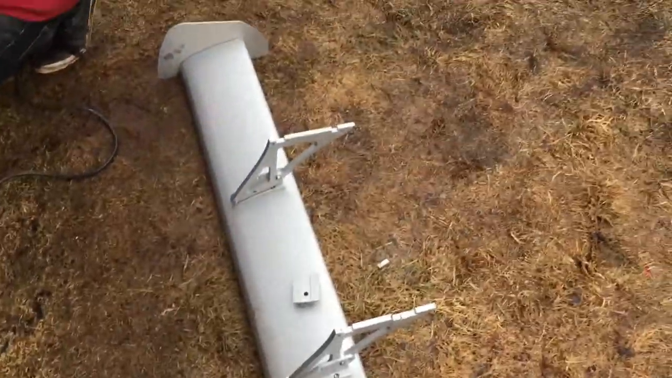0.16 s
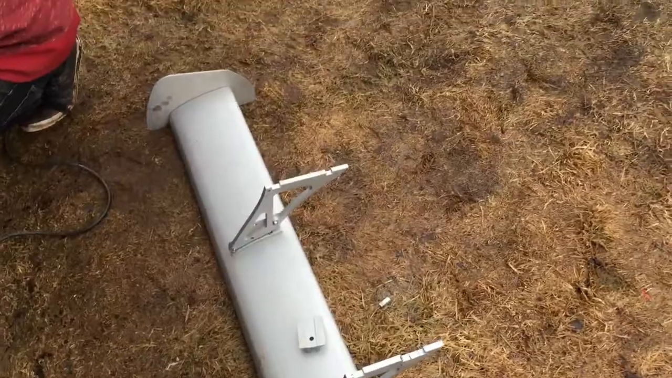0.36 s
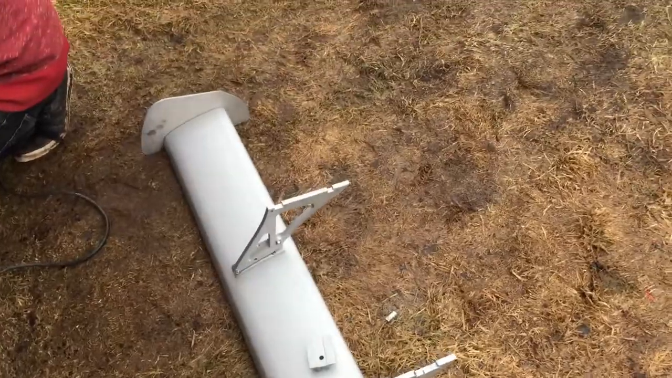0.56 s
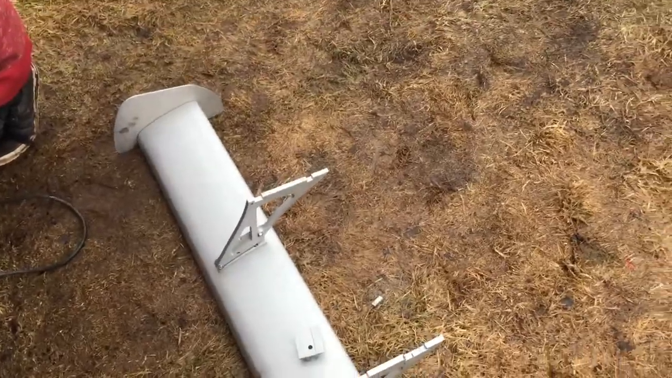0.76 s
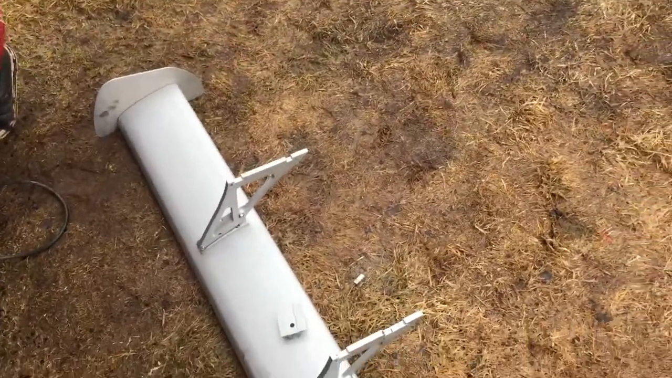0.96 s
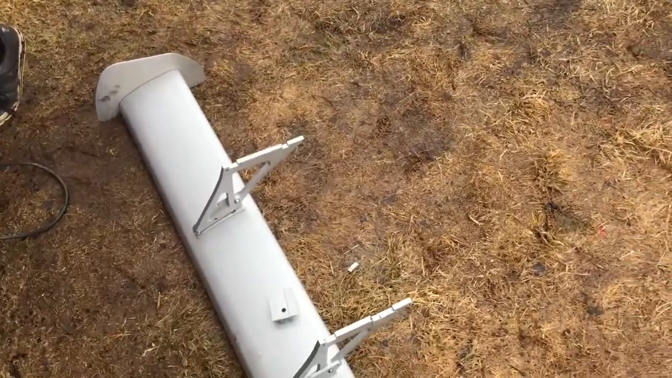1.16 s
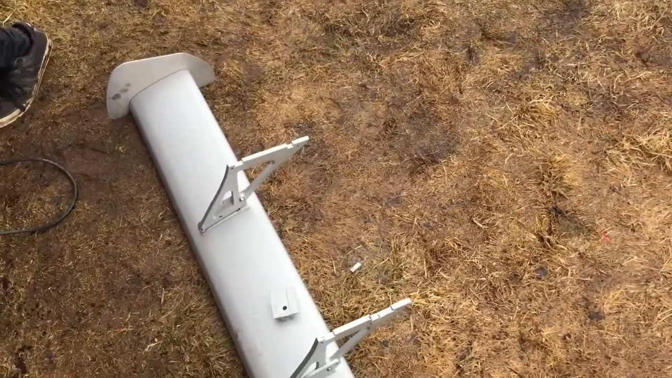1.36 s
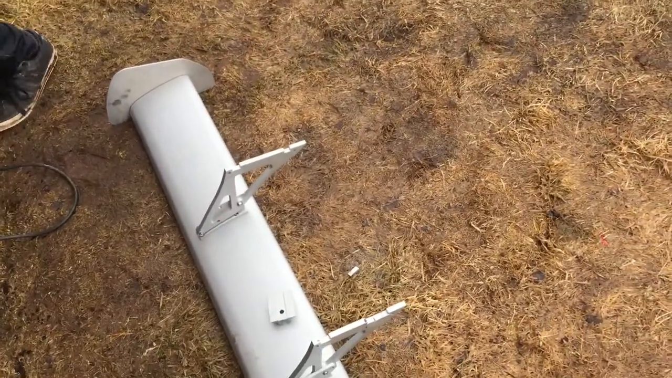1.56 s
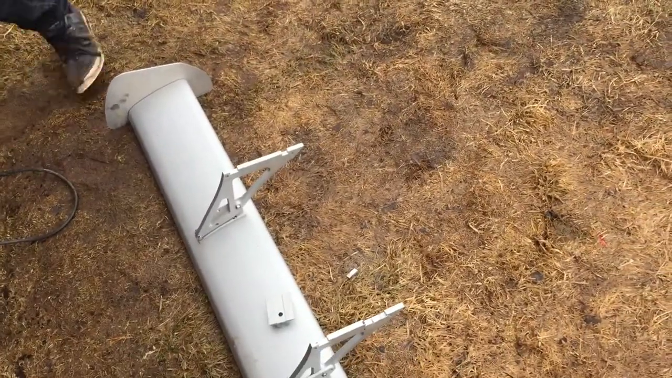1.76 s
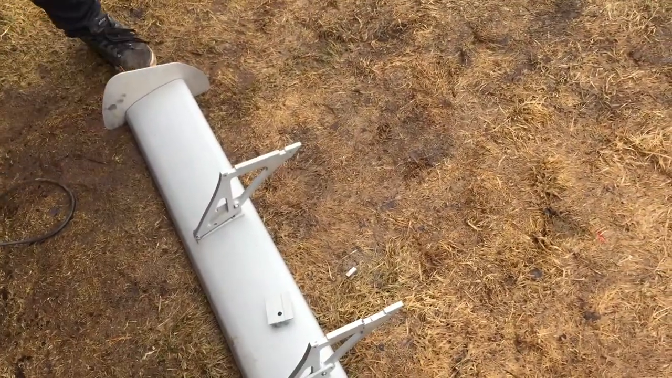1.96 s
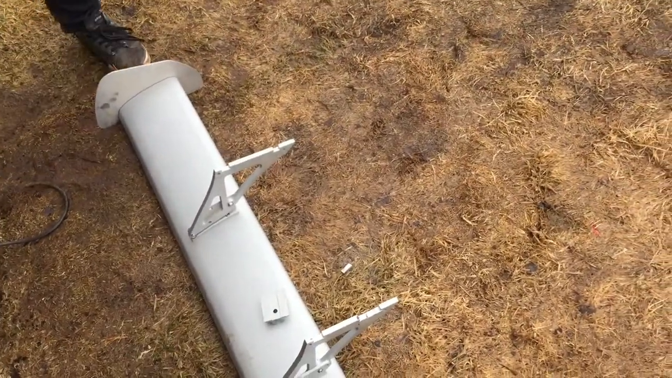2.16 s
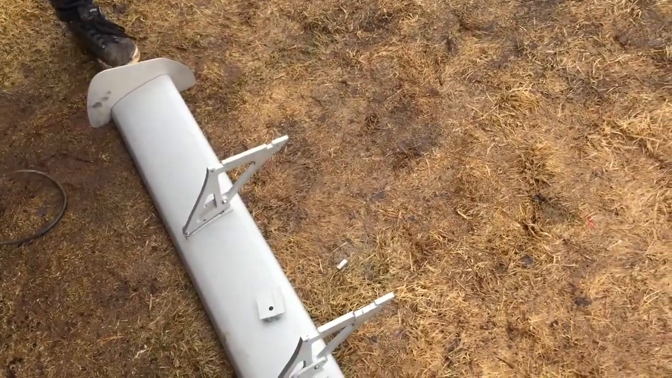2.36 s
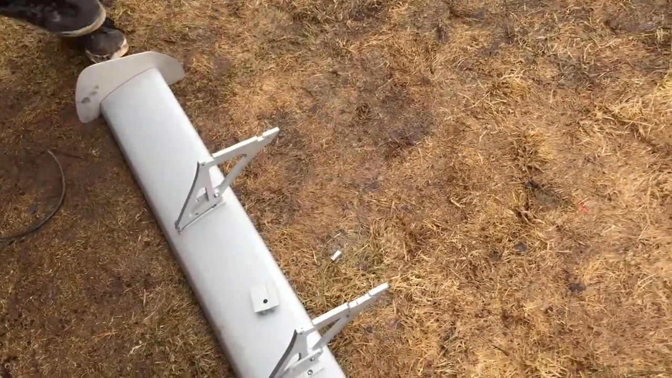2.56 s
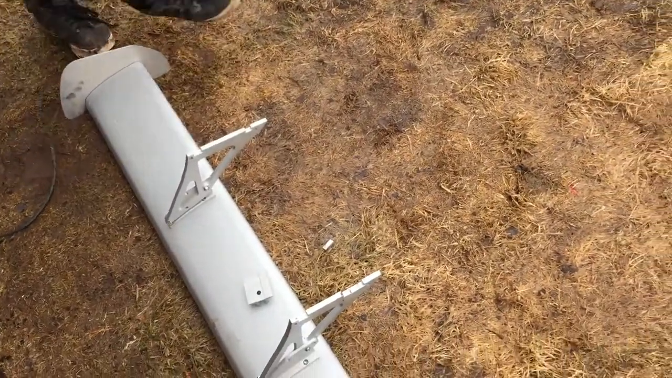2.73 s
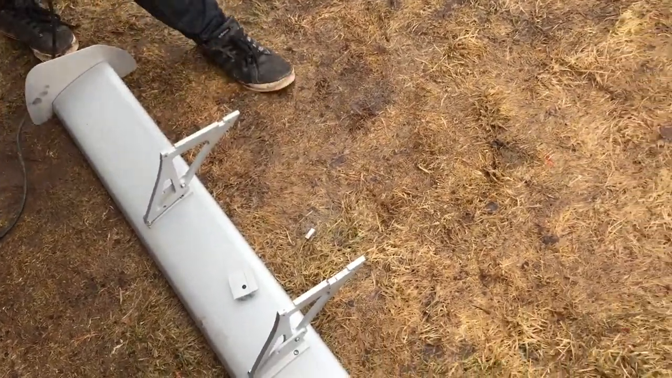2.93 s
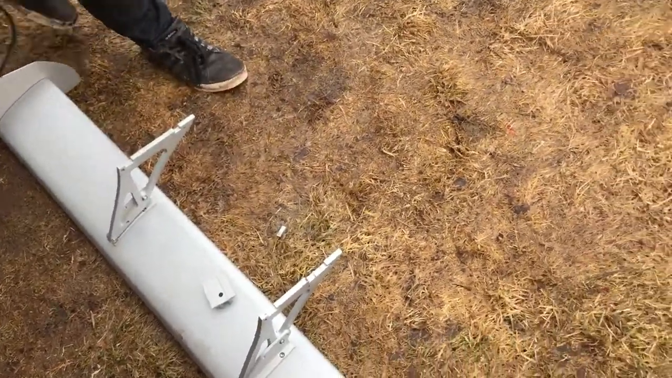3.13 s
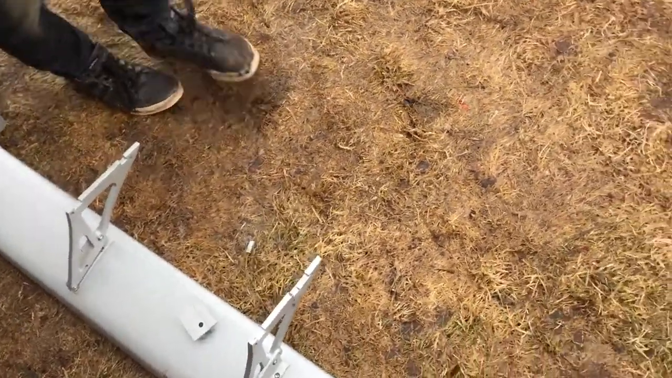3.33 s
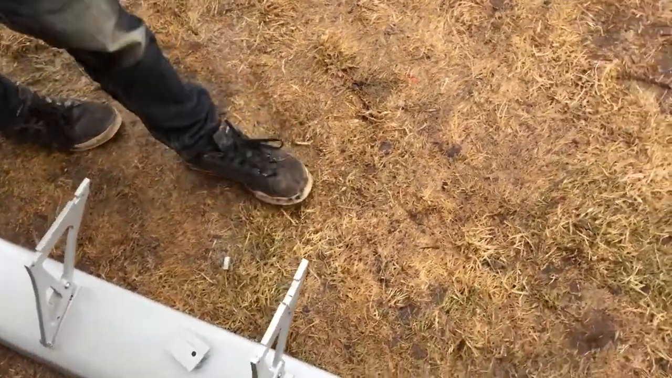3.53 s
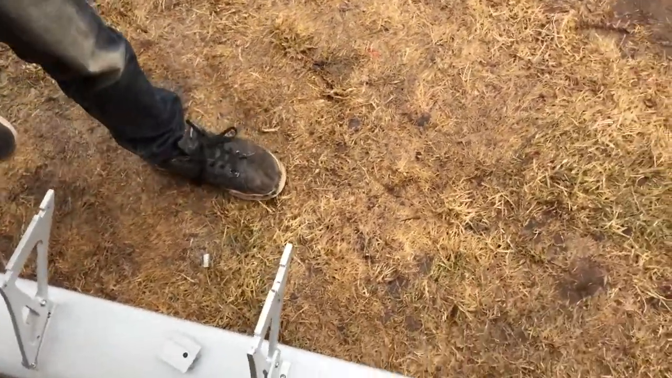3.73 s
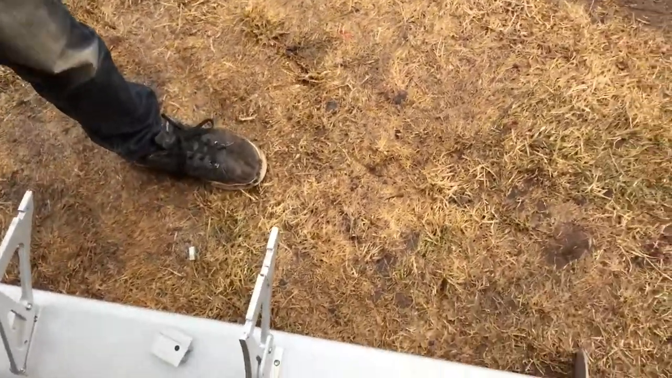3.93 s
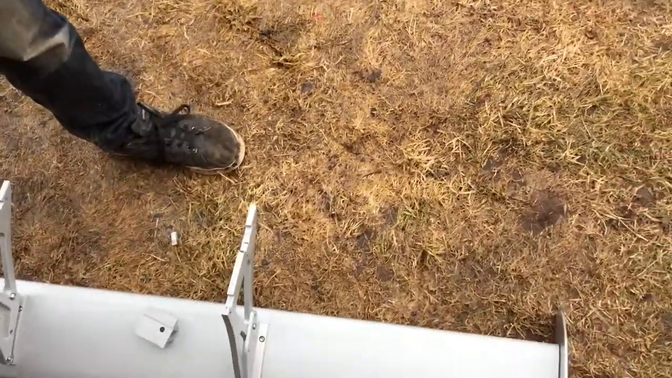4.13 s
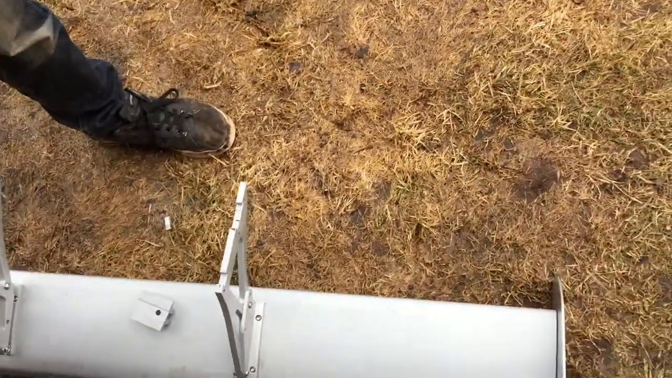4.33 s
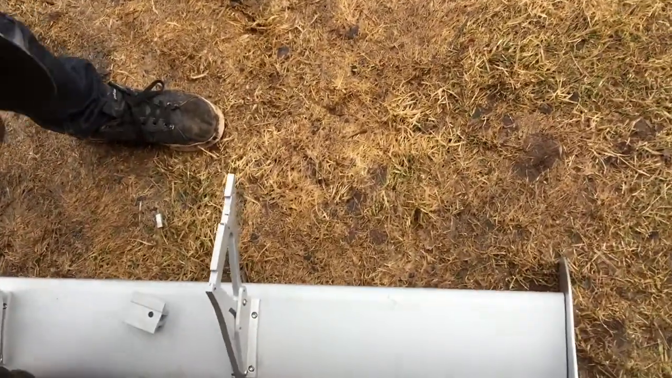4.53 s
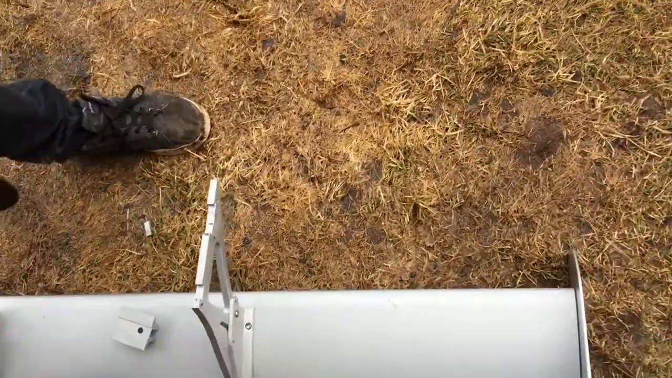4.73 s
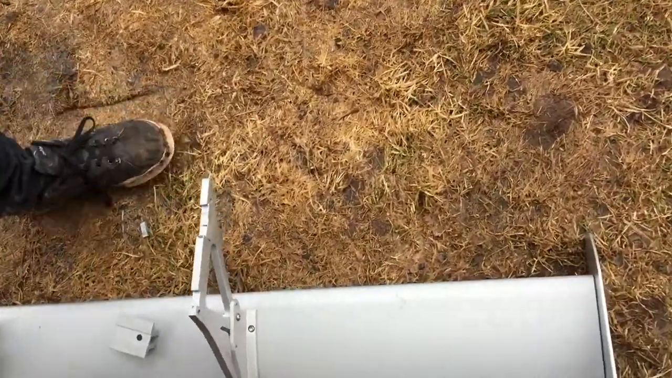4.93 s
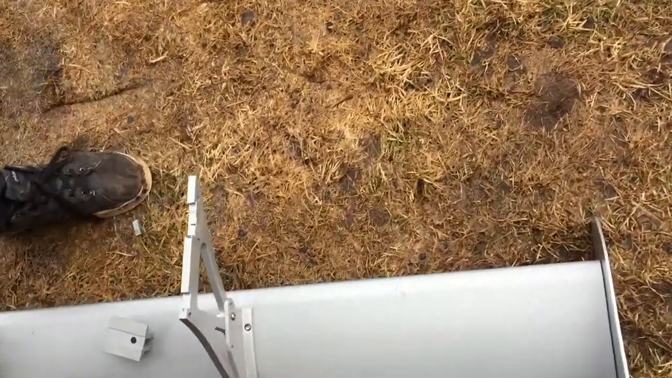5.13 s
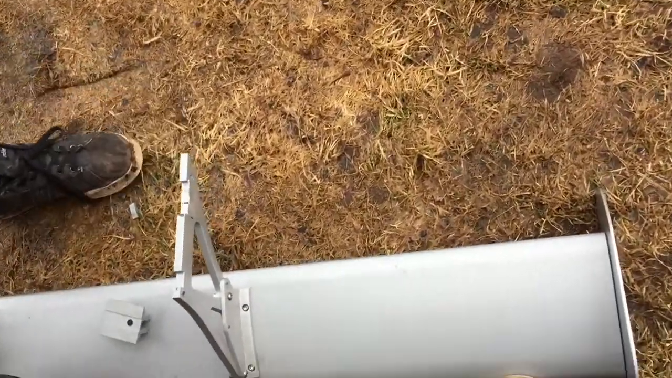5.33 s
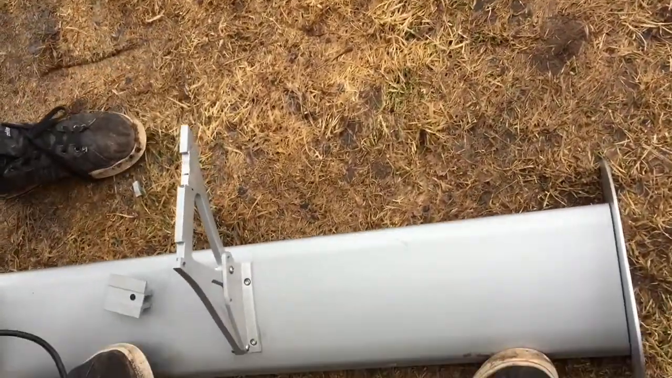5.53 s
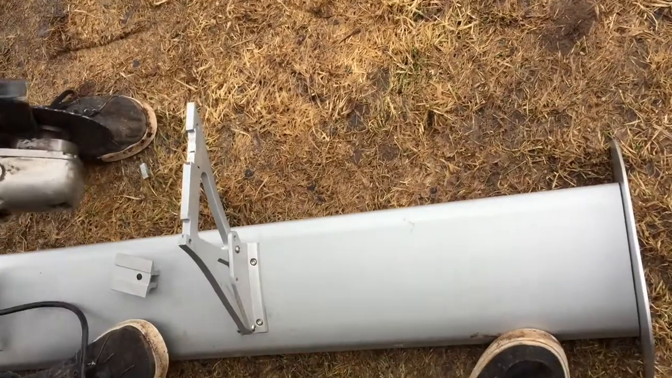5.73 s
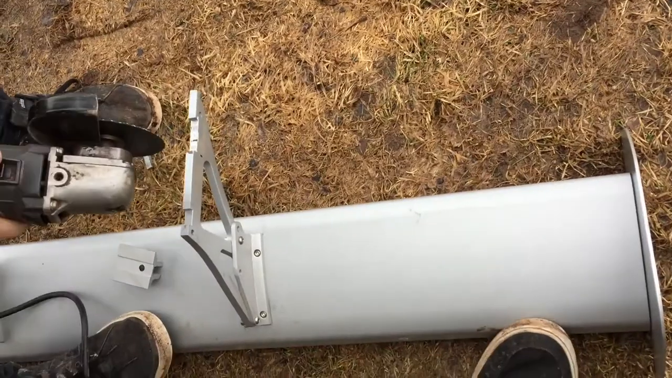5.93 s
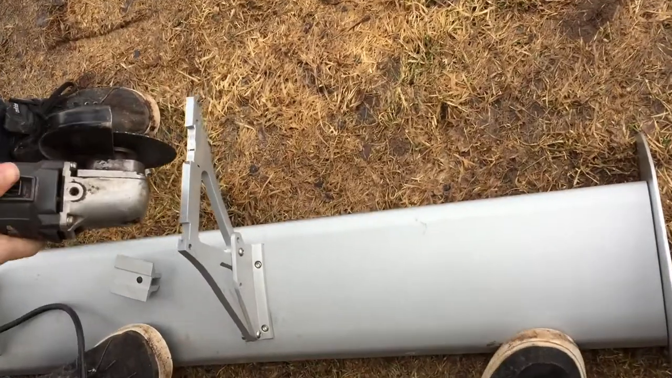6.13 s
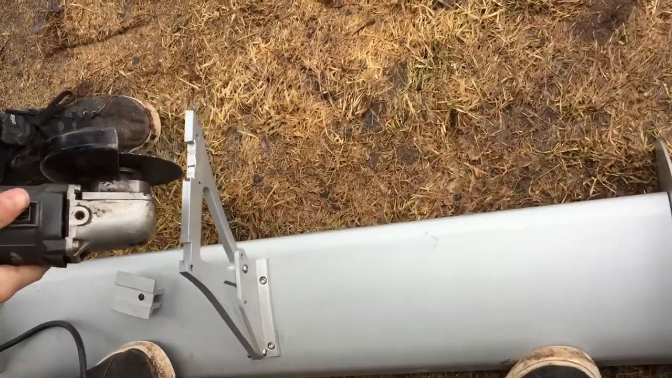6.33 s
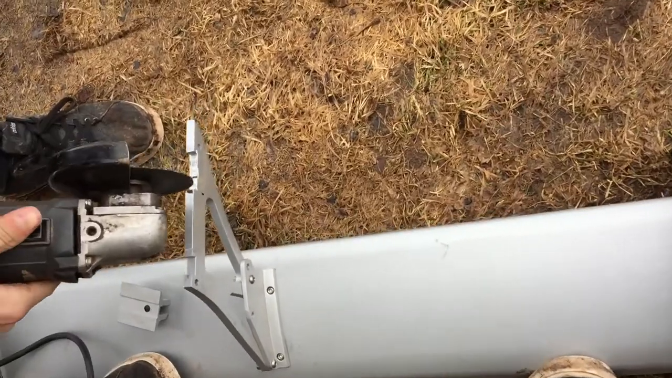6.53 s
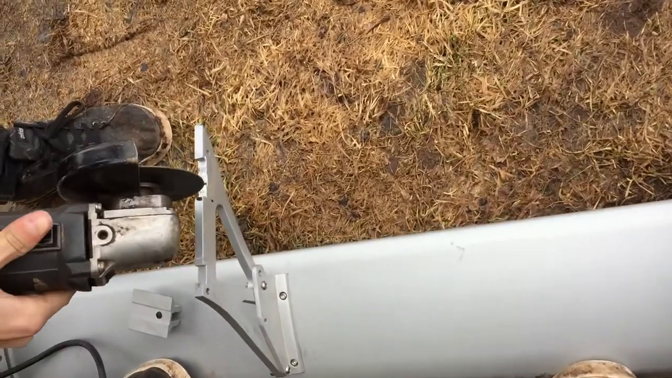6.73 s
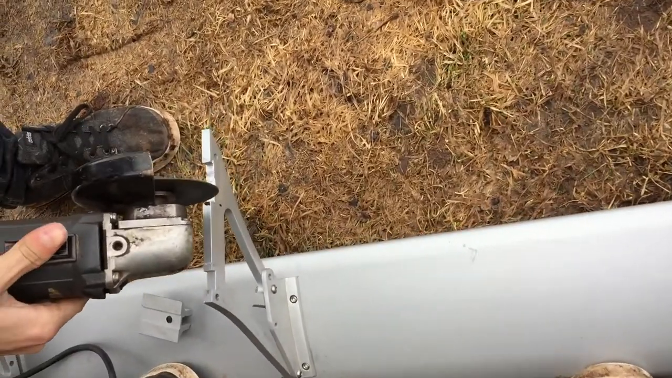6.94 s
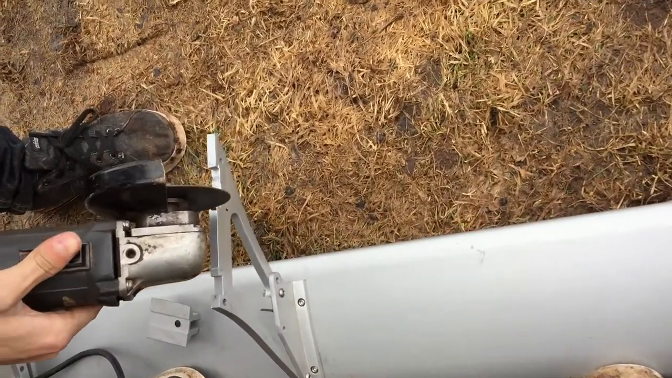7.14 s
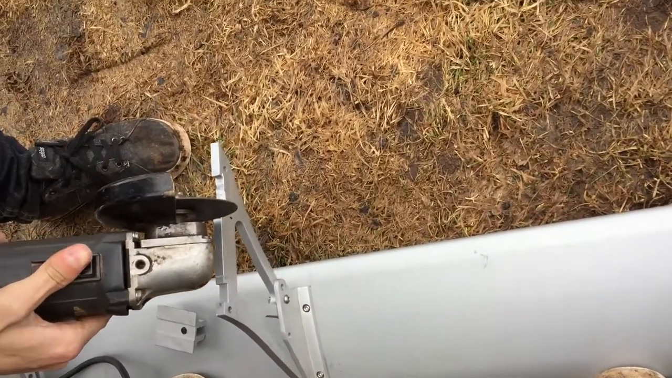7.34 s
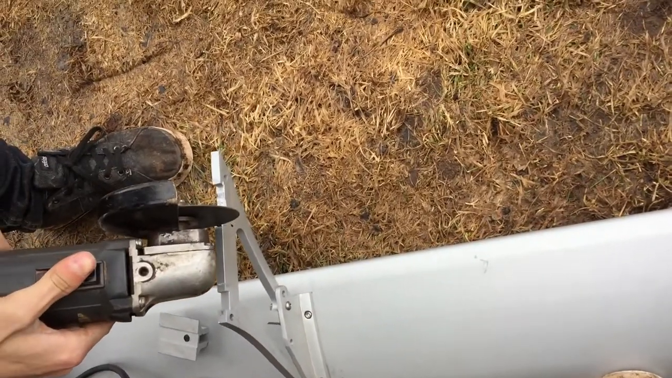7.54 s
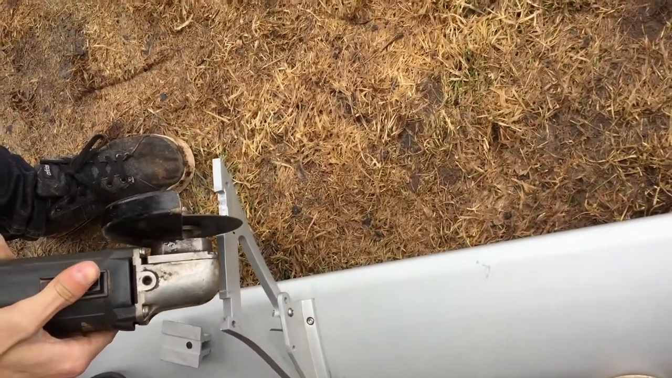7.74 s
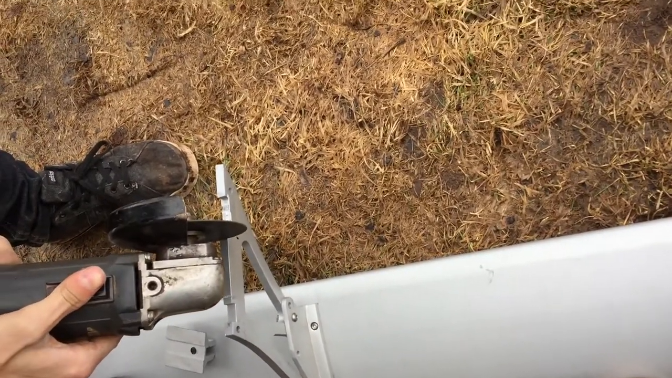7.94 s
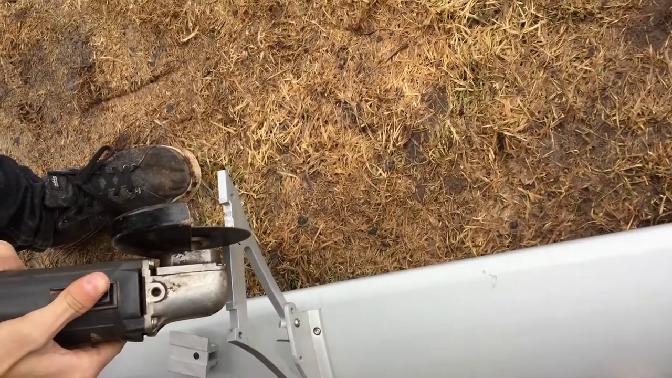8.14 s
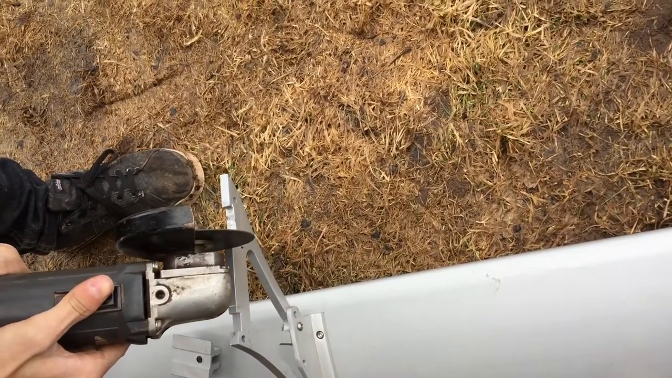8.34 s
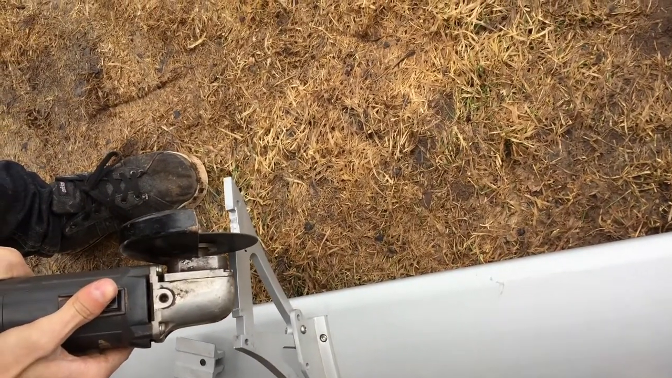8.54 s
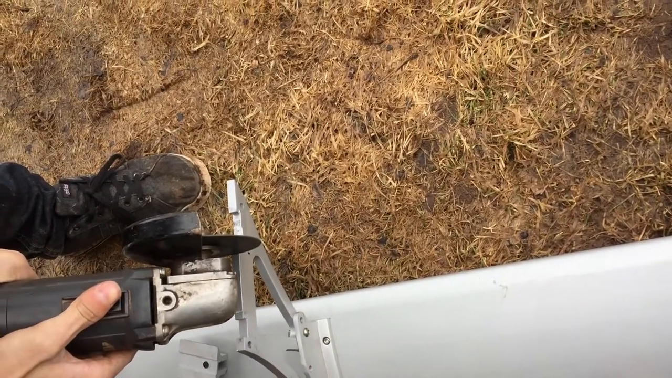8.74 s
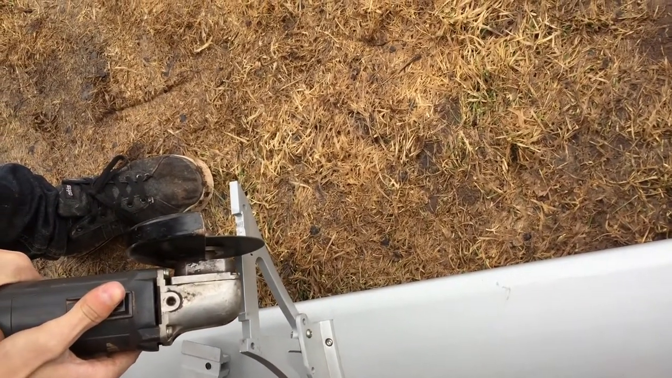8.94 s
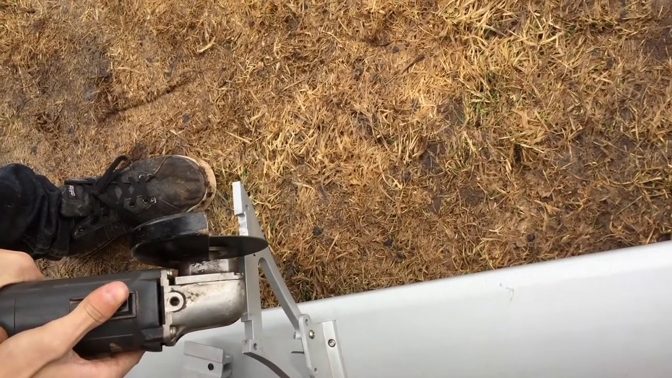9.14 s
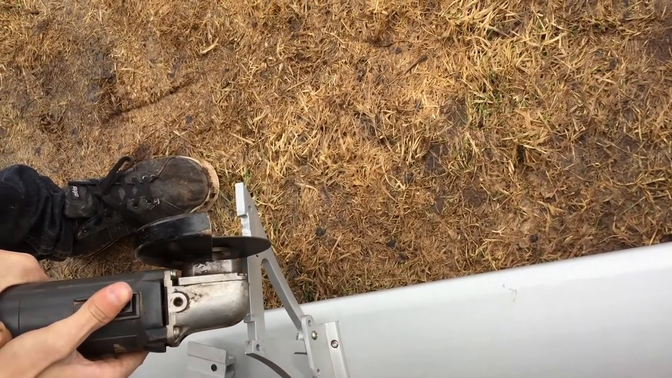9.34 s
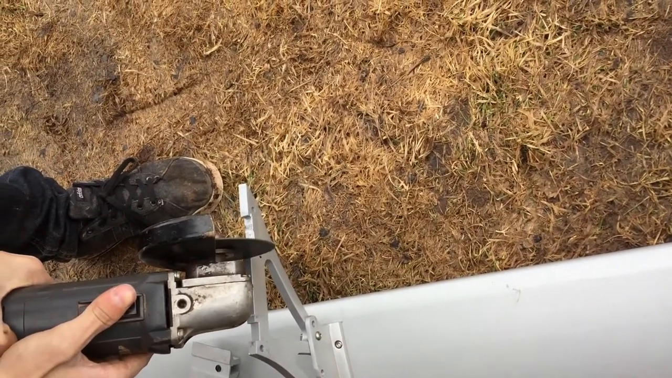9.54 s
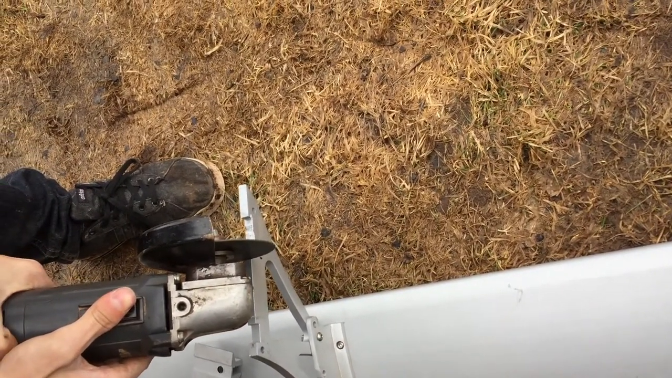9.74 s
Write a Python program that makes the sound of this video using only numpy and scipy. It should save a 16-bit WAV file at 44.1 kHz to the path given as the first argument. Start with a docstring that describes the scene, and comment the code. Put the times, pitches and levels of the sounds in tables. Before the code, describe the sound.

An angle grinder outdoors blips briefly and coasts down, then restarts close by with a loud whine and cuts into metal.

```python
"""An angle grinder in an open field, on one mono microphone: a short blip a little way off, a coast down,
then a restart close by, and the disc bites into a metal bracket. Fan, brushes and gears roar through the
housing, shaft and armature slots whine, and the rim scrapes and sings as the cut drags the motor down.
Around it, boots crunch in dry grass, the switch clicks and a metal tube is knocked. Small birds and an
engine are far off, and wind buffets the microphone."""
import sys
import numpy as np
from scipy import signal
from scipy.fft import rfft, irfft
from scipy.io import wavfile
from scipy.ndimage import uniform_filter1d, map_coordinates

SR = 44100
rng = np.random.default_rng(int(sys.argv[2]) if len(sys.argv) > 2 else 0)


def log_audio(samples):
    """Write samples as a 16-bit WAV file to the path given in sys.argv[1]."""
    # one column per channel
    frames = np.atleast_2d(samples).T
    # limit to full scale, then quantise
    limited = np.clip(frames, -1, 1)
    pcm = np.round(limited * 32767).astype(np.int16)
    wavfile.write(sys.argv[1], SR, pcm)


N = 436149
T = np.arange(N) / SR

BLIP_ON_S, BLIP_OFF_S, CUT_ON_S = 2.1605, 2.335, 6.7365
SLOTS, GEAR = 12, 14 / 38  # armature slots; disc turns per shaft turn
# Motor speed is counted in slots passing per second. It nears free speed in a quick and a slow stage.
FREE_HZ, QUICK_SHARE, QUICK_S, SLOW_S, LEAD_S = 5573, .5242, .0858, .353, .0123
FRICTION_HZ_PER_S, DRAG_PER_S, OFF_DROP_HZ = 1103, .2573, 18
# The cut slows the motor. Each row: time in seconds, slot rate lost in Hz.
LOAD_SAG = [(8.03, 0), (8.28, 86), (8.45, 114), (8.7, 196), (8.87, 280), (9.04, 386), (9.21, 525),
            (9.89, 1135)]
# Roar of the farther blip and the close cut. Each row: time in seconds, gain in dB, then bass and
# treble in dB against the middle band.
BLIP_ROAR = [(2.17, -16, -22, -11), (2.33, -20, -11.5, -7), (2.47, -25, -11.5, -7),
             (3.0, -27.5, -10.5, -10), (3.5, -34.5, -6.5, -5), (3.95, -38.5, -6.5, -1.5),
             (4.4, -37.5, -12.5, -9.5), (4.64, -44.5, -4, -19), (4.68, -65, -19, -12)]
CUT_ROAR = [(6.74, -9, -17.5, -14.5), (6.78, -16.5, -14.5, -4), (6.93, -11, -18, -9),
            (7.21, -10, -12, -7.5), (7.71, -14, -13.5, -6.5), (8.6, -13.5, -11, -7.5),
            (9.05, -16.5, -6, -3.5), (9.24, -17, -10, -5), (9.89, -18, -9, -6.5)]
# Roar under power and coasting. Each row: frequency in Hz, relative density in dB.
POWERED_SPECTRUM = [(59, -71.5), (100, -36), (396, -19), (450, -28.5), (511, -14), (1220, -5.5),
                    (1440, -8.5), (1640, -2), (1900, -6), (3660, 2.5), (5030, -4), (5600, -1.5), (7370, -8),
                    (9110, -8), (15800, -16)]
COASTING_SPECTRUM = [(59, -52), (100, -51.5), (249, -6.5), (307, -12.5), (441, -12.5), (673, -3.5),
                     (1600, 5.5), (4530, 2), (4930, -7), (8550, -14), (10300, -16), (12000, -17.5),
                     (15800, -15.5)]
# Modes of housing and guard. Each row: frequency in Hz, width in Hz, boost under power in dB,
# nominal boost when coasting in dB.
HOUSING_MODES = [(1230, 250, 3, 2), (1620, 100, 4, 2), (2430, 400, 2, 6), (3200, 100, 5, 2),
                 (3560, 150, 5, 3), (3910, 60, 5, 5), (4660, 130, 3, 5), (5710, 90, 8, 5),
                 (6100, 100, 2, 6), (6670, 180, 5, 7), (8360, 150, 4, 5), (8920, 120, 5, 3),
                 (10100, 200, 3, 1), (11800, 300, 3, 6)]
# Whines close by, at 1 and 4 times the shaft rate and 1 and 2 times the slot rate.
# Each row: pitch passed in Hz, unloaded level in dB.
SHAFT_WHINE = [(60, -65), (170, -48.5), (260, -34.5), (350, -37), (420, -33.5), (460, -36)]
FOURTH_WHINE = [(200, -75.5), (480, -65.5), (650, -45.5), (820, -37.5), (1000, -43), (1220, -30),
                (1420, -37), (1570, -21.5), (1770, -23), (1830, -28.5)]
SLOT_WHINE = [(300, -80), (640, -52), (1000, -41), (1220, -22), (1450, -33), (1700, -23), (2300, -21),
              (2800, -20), (3500, -14.5), (3950, -26), (4350, -22), (4650, -21.5), (4890, -34), (5080, -22),
              (5340, -16.5), (5500, -19)]
SLOT_OCTAVE_WHINE = [(600, -66.5), (1300, -47), (2100, -35.5), (2600, -36), (3500, -20), (4500, -24),
                     (5700, -34), (7200, -38), (8500, -26), (9400, -30), (10000, -34), (10350, -52),
                     (10750, -32), (11000, -33)]
FARTHER_DB, CLOSE_DB = (-16.5, -4.5, -4, -13), (0, 0, 0, 0)  # each whine's gain at the two distances
LOAD_DB_PER_KHZ = -10., -4., -5., -3.  # each whine sinks as the slot rate sags
CLATTER_PER_S, CLATTER_DB, CLATTER_T60 = 130, -11.5, .03

# Pressure of the disc on the metal. Each row: time in seconds, scrape level in dB.
DISC_PRESSURE = [(8.6, -53), (8.85, -27), (9.05, -20), (9.5, -20.5), (9.89, -22)]
# The scraped bracket. Each row: frequency in Hz, gain in dB.
BRACKET_RESPONSE = [(300, -45), (900, -22), (1600, -8), (3400, 0), (5000, -8), (7000, -8), (8000, -16),
                    (10100, -8), (11000, -15), (13700, -4), (15800, -7)]
# Lobes of the uneven rim. Each row: bumps per disc turn, level on entering in dB, level deeper in dB.
RIM_LOBES = [(2, -60, -46), (4, -31, -60), (5, -60, -31), (6, -60, -37), (8, -30, -27), (10, -60, -38),
             (12, -34, -60), (13, -34, -36), (17, -60, -36), (19, -36, -60), (20, -32, -60), (21, -31, -45),
             (22, -60, -32), (23, -40, -40), (24, -60, -34)]
ENTER_S, DEEPER_S = (9.03, 9.47), (9.45, 9.98)  # start and end of each stage of the cut

# Switch, cord and housing. Each row: start in seconds, level in dB, centre in Hz, decay scale in
# seconds, then dull tail and bright tick in dB against the clack.
CLICKS = [(0.839, -62, 1880, 0.03, 0, -14), (1.0244, -50, 2900, 0.04, -16, -18),
          (1.077, -44.5, 2090, 0.12, -20, -31), (1.112, -45, 3340, 0.034, -12, -28),
          (1.161, -46.5, 1870, 0.036, -13, -34), (1.2513, -13.5, 3300, 0.013, -10.5, -11),
          (1.529, -52, 2220, 0.048, 11, 4), (1.6865, -20.5, 4150, 0.042, -1.5, -34),
          (1.7265, -37.5, 2020, 0.069, -5, -32), (1.7596, -41, 2980, 0.055, -15, -31),
          (1.922, -46, 3300, 0.032, -4, 2), (2.0395, -35.5, 2450, 0.078, -9, -31),
          (2.1607, -10, 3140, 0.034, -13, -33), (3.5524, -20.5, 3320, 0.14, -30, -12),
          (4.767, -39, 3500, .03, -14, -25), (5.298, -42, 2770, 0.036, -24, -26),
          (5.3408, -43, 4560, 0.03, -29, -32), (5.44, -45.5, 1800, 0.04, -7, -28),
          (5.627, -44, 2920, 0.04, -21, -33), (5.8012, -44, 1950, 0.03, -20, -32),
          (5.8567, -49.5, 3480, 0.03, -5.5, -22), (6.345, -31, 2800, 0.048, -28, -22),
          (6.363, -28, 2970, 0.053, -25, -28), (6.5425, -51.5, 4350, 0.03, -14, -18),
          (6.5554, -56.5, 2970, 0.03, -11, -18), (6.5824, -57.5, 2600, 0.03, -12, -5),
          (6.6029, -61, 1890, 0.03, -14, -19), (6.671, -43, 3020, 0.041, -29, -7),
          (6.7359, -7, 3450, 0.092, -20.5, -31)]
# Knocks on the tube. Each row: start in seconds, gain in dB, pitch factor, decay factor.
KNOCKS = [(3.079, -28, 1.04, 0.82), (4.104, -27, 1.23, 3.2), (4.69, -28.5, 0.99, 0.74),
          (5.099, -37.5, 0.98, 1.05), (5.125, -26, 1.04, 1.9), (5.144, -31, 0.98, 2.5),
          (5.187, -36, 0.95, 1.6), (5.212, -31.5, 0.78, 1.2), (5.426, -42, 0.65, 0.88),
          (5.443, -31.5, 0.97, 1.5), (5.459, -33.5, 0.79, 1.1), (5.488, -41, 0.98, 2.2),
          (5.8, -23, 1.53, 1.25), (5.861, -36, 1.4, 1.2), (5.951, -45.5, 1.05, 1.2), (6.041, -40, 1.02, 1)]
# The tube's ring. Each row: base frequency in Hz, relative level in dB, base t60 in seconds.
TUBE_MODES = [(500, -11, 0.15), (528, -2.5, 0.052), (700, -4, 0.14), (767, -2, 0.08), (1093, -12.5, 0.14),
              (1250, -32, .04)]
# Air hitting the microphone. Each row: start in seconds, envelope peak in dB, frequency in Hz.
THUMPS = [(1.82, -41, 50), (8.913, -20.5, 59.9), (8.917, -15.5, 196), (9.07, -19, 140)]

# Boots and clothes, in two spells. Each row: time in seconds, grass level in dB, scuff level in dB.
RUSTLE_SPELLS = [
    [(0.0, -68, -55), (0.38, -73, -62.5), (1.0, -68, -57), (1.45, -65.5, -57.5), (1.62, -57, -56.5),
     (1.84, -65, -59), (2.04, -66, -59), (2.16, -41.5, -56)],
    [(4.6, -51, -53), (4.8, -67.5, -62.5), (5.23, -62, -59), (5.4, -67.5, -61.5), (5.81, -65.5, -64.5),
     (6.65, -70.5, -69), (6.73, -72, -58)],
]
# Grass hiss and sole scuff. Each row: frequency in Hz, relative density in dB.
GRASS_SPECTRUM = [(710, -39.5), (1200, -7), (1830, -6.5), (1950, -8), (2320, -8.5), (4470, -10),
                  (6960, -17), (14300, -23.5), (15800, -30.5)]
SCUFF_SPECTRUM = [(120, -35.5), (200, -7), (416, -11.5), (449, -11), (524, -9), (727, -6.5), (908, -8),
                  (2000, -30), (2600, -66), (4400, -120)]
# Dry grass and cloth. Each row: start in seconds, length in seconds, level in dB, centre in Hz.
CRUNCHES = [(0, 0.052, -52.5, 2070), (.26, 0.085, -71, 2800), (0.76, 0.11, -67, 3200),
            (0.892, 0.071, -52, 2220), (1.017, 0.029, -60, 3980), (1.11, 0.038, -58, 3260),
            (1.25, 0.052, -54, 3000), (1.467, 0.11, -58.5, 5250), (1.586, 0.062, -51, 4140),
            (1.692, 0.069, -53, 2480), (1.912, .04, -59, 5000), (2.02, 0.049, -48, 3000),
            (4.698, 0.16, -50.5, 3080), (5.004, 0.22, -46, 2680), (5.174, 0.13, -62, 2700),
            (5.296, 0.092, -48, 3170), (5.429, 0.036, -52, 2500), (5.609, 0.067, -57.5, 3500),
            (5.769, 0.049, -47.5, 3180), (6.333, 0.037, -49, 3180), (6.711, .008, -53, 3500),
            (6.724, .016, -49, 2860)]
# Small birds. Each row: start in seconds, length in seconds, first and last pitch in Hz, level in dB.
CHIRPS = [(0, .055, 6500, 7400, -55), (.89, .05, 5800, 7300, -58), (1.008, .04, 4000, 5850, -64),
          (1.77, .02, 4150, 4200, -65), (.375, .02, 7400, 6400, -69), (.46, .02, 6500, 5700, -72),
          (.6, .02, 5600, 7000, -73)]

# Far wash of the field, and the low rumble. Each row: frequency in Hz, relative density in dB.
FIELD_SPECTRUM = [(18, -31), (30, -14), (71, -10), (301, -20.5), (362, -23), (424, -15.5), (471, -6.5),
                  (1120, 2), (1990, -15), (3110, -30.5), (15800, -28)]
RUMBLE_SPECTRUM = [(20, -11.5), (45, 4.5), (80, 4.5), (160, -4), (350, -28), (700, -43.5)]
# Low rumble: the far engine at first, then breeze on the microphone.
# Each row: time in seconds, level in dB.
LOW_RUMBLE = [(0.0, -59), (0.45, -52.5), (1.38, -59.5), (1.6, -70), (3.2, -61), (4.6, -61), (5.4, -62.5),
              (6.7, -64.5), (7.7, -91), (8.84, -78), (9.0, -54), (9.89, -64)]
# Puffs of wind on the microphone. Each row: middle in seconds, length in seconds, level in dB.
PUFFS = [(1.83, 0.088, -56), (3.86, 0.13, -56), (4.354, 0.079, -53), (4.51, 0.2, -56), (4.785, 0.09, -59),
         (5.18, 0.062, -57), (5.264, 0.055, -59), (5.87, 0.088, -62), (8.94, 0.1, -47), (9.063, .2, -41),
         (9.426, 0.31, -41), (9.783, 0.14, -56)]
# Faint hums and squeals of metal. Each row: start and end in seconds, pitch in Hz, level and waver in dB.
STEADY_TONES = [(0, 9.9, 360, -69, 1.5), (0, 9.9, 237, -71, 1.5), (4.2, 4.66, 1356, -49, 1.5),
                (3.7, 4.05, 1356, -52, 2), (3.65, 4.64, 248, -60, 4), (9.15, 9.9, 3548, -28, 4),
                (8.95, 9.8, 3140, -30.5, 4), (7.4, 9.9, 5617, -39, 4), (9.0, 9.72, 10120, -41, 6)]
ENGINE_HZ, ENGINE_DB, ENGINE_FALL_HZ, LEAVES_S, GONE_S = 74.5, -50, 7.7, 1.1, 1.42
FIELD_DB = -70.5
EDGE_HZ, TOP_HZ = 15830, 17087  # where the treble falls away; ceiling of the whines


def grinder(roar_rows, on, off, distance_db):
    """One motor run: roar, whine and gear clatter, and the bite if it lasts until the disc meets metal."""
    times, *levels = np.transpose(roar_rows)
    t = np.arange(on, times[-1], 1 / SR)
    roar_db, bass_db, treble_db = (np.interp(t, times, level) for level in levels)
    sag_hz = uniform_filter1d(np.interp(t, *np.transpose(LOAD_SAG)), size=3000, mode="nearest")
    slot_hz = slot_rate(t, on, off) - sag_hz
    shaft_hz = slot_hz / SLOTS * (1 + .0006 * wander(len(t), size=300))
    out = amp(roar_db) * roar(t, np.cumsum(shaft_hz) / SR, bass_db, treble_db, off)
    whines = whine(slot_hz, shaft_hz, sag_hz, t < off, distance_db)
    # current surges roughen the whine while the motor gains speed
    surge = np.clip(np.gradient(slot_hz) * SR / 8000, 0, 1)
    out += whines * amp(4 * surge * wander(len(t), size=90))
    out += surge * amp(roar_db + CLATTER_DB) * clatter(len(t))
    if t[-1] > DISC_PRESSURE[0][0]:
        out += bite(t, GEAR * shaft_hz)
    return out * span(t, on, np.inf, 0.0011)


def slot_rate(t, on, off):
    """The motor spins up while the current is on, then coasts against friction and fan drag."""
    age = np.minimum(t, off) - on + LEAD_S
    shortfall = QUICK_SHARE * np.exp(-age / QUICK_S) + (1 - QUICK_SHARE) * np.exp(-age / SLOW_S)
    driven = FREE_HZ * (1 - shortfall)
    friction_hz = FRICTION_HZ_PER_S / DRAG_PER_S
    slowing = np.exp(-DRAG_PER_S * np.maximum(t - off, 0))
    coast = (driven - OFF_DROP_HZ + friction_hz) * slowing - friction_hz
    return np.maximum(np.where(t < off, driven, coast), 0)


def roar(t, turns, bass_db, treble_db, off):
    """Fan, brushes and gears: noise in the housing modes, throbbing with shaft and disc."""
    frames = len(t) // 128 + 5
    at = np.minimum(np.arange(frames) * 128, len(t) - 1)
    real, imag, flicker = rng.standard_normal((frames, 257, 3)).T
    flicker = unit_rms(uniform_filter1d(uniform_filter1d(flicker, size=5, axis=0), size=14, axis=1))
    shape = housing_spectrum(t[at], bass_db[at], treble_db[at], off) * amp(1.2 * flicker)
    noise = signal.istft((real + 1j * imag) * shape, nperseg=512, noverlap=384)[1][:len(t)]
    throb = 1 + 0.047 * np.cos(2 * np.pi * turns) + 0.078 * np.cos(2 * np.pi * GEAR * turns)
    rattle = amp(0.87 * wander(len(t), size=40) + 0.64 * wander(len(t), size=600))
    # unloaded gear teeth chatter in their slack: a burst of random size each shaft turn
    slaps = np.diff(np.floor(turns), prepend=0) * rng.uniform(.3, 1, len(t))
    slaps *= span(t, off + .8, np.inf, .9)
    chatter = 2.6 * signal.lfilter([1], [1, -np.exp(-1 / (.004 * SR))], slaps)
    bright = signal.sosfilt(signal.butter(2, 1200, "high", fs=SR, output="sos"), noise)
    return (noise + chatter * bright) * throb * rattle * 0.85


def housing_spectrum(t, bass_db, treble_db, off):
    """Housing and guard resonances shape the roar, frame by frame, in three bands."""
    hz = np.fft.rfftfreq(512, 1 / SR)[:, None]
    powered = coasting = 1
    for mode_hz, width_hz, powered_db, coasting_db in HOUSING_MODES:
        peak = 1 / (1 + (2 * (hz - mode_hz) / width_hz) ** 2)
        powered += (amp(powered_db) - 1) * peak
        coasting += (amp(coasting_db) - 1) * peak
    emphasis = np.clip(.6 + .6 * (t - off), 0, 2)  # the modes stand out more as the fan quiets
    body = np.where(t < off, amp(db_at(POWERED_SPECTRUM, hz)) * powered,
                    amp(db_at(COASTING_SPECTRUM, hz)) * coasting ** emphasis)
    low, high = 1 / (1 + (hz / 950) ** 4), 1 / (1 + (5500 / (hz + 1)) ** 8)
    bands = low * body, np.clip(1 - low - high, 0, 1) * body, high * body
    bass, middle, treble = (band / np.linalg.norm(band, axis=0) for band in bands)
    return bass * amp(bass_db) + middle + treble * amp(treble_db)


def whine(slot_hz, shaft_hz, sag_hz, powered, distance_db):
    """Shaft and armature slots sing at multiples of the shaft rate, swelling and fading with pitch."""
    orders = 1, 4, SLOTS, 2 * SLOTS, 3 * SLOTS
    curves = SHAFT_WHINE, FOURTH_WHINE, SLOT_WHINE, SLOT_OCTAVE_WHINE
    levels = [db_at(curve, order * slot_hz / SLOTS) + db + load * sag_hz / 1000
              for curve, order, db, load in zip(curves, orders, distance_db, LOAD_DB_PER_KHZ)]
    levels.append(np.where(powered, levels[-1] - 11, -200))  # top order: magnetic, gone without current
    return sum(tone(np.minimum(order * shaft_hz, TOP_HZ), db, 1.2) for order, db in zip(orders, levels))


def clatter(count):
    """Gear teeth knock at random under the starting torque and ring the upper housing modes."""
    t = np.arange(2000) / SR
    hits = (rng.random(count) < CLATTER_PER_S / SR) * amp(4 * rng.standard_normal(count))
    ring = sum(amp(2 * boost_db - 60 * t / CLATTER_T60) * np.sin(2 * np.pi * hz * t)
               for hz, _, boost_db, _ in HOUSING_MODES if hz > 4000)
    return unit_rms(signal.oaconvolve(hits, ring)[:count])


def bite(t, disc_hz):
    """The rough rim repeats its scratch on the bracket each turn and wears slowly; its lobes sing."""
    turns = np.cumsum(disc_hz) / SR
    rim = uniform_filter1d(rng.standard_normal((int(turns[-1]) + 2, 320)), size=24, axis=0)
    scratch = map_coordinates(rim, [turns, turns % 1 * 320], order=1, mode="wrap")
    pressure = amp(np.interp(t, *np.transpose(DISC_PRESSURE), left=-200))
    enter, deeper = span(t, *ENTER_S, .08), span(t, *DEEPER_S, .08)
    singing = sum((enter * amp(enter_db) + deeper * amp(deeper_db)) * tone(bumps * disc_hz, 0, 2)
                  for bumps, enter_db, deeper_db in RIM_LOBES)
    return pressure * colour(scratch, BRACKET_RESPONSE) + singing


def clicks():
    """Switch, cord and housing give dry clacks, each with a bright tick and a dull tail."""
    out, t = np.zeros(N), np.arange(6000) / SR
    for start, db, hz, decay_s, dull_db, tick_db in CLICKS:
        clack, dull, tick = rng.standard_normal((3, len(t)))
        fall_db = -60 * t / np.clip(decay_s, .008, .1)
        clack = colour(clack, hump(hz, 1.44, 11)) * (amp(2.6 * fall_db) + .1 * amp(.5 * fall_db))
        dull = colour(dull, hump(800, 3.5, 26)) * amp(dull_db + 0.63 * fall_db)
        tick = colour(tick, hump(9500, 1.2, 9)) * amp(tick_db + 2.9 * fall_db)
        add(out, start, amp(db) * (clack + dull + tick))
    return out


def tube_knocks():
    """Each knock thuds and rings the metal tube's modes, a little differently tuned every time."""
    out, t = np.zeros(N), np.arange(6000) / SR
    for start, db, pitch, decay in KNOCKS:
        detunes = rng.uniform(0.93, 1.04, len(TUBE_MODES))
        ring = sum(amp(mode_db - 60 * t / (t60 * decay)) * np.sin(2 * np.pi * hz * pitch * detune * t)
                   for detune, (hz, mode_db, t60) in zip(detunes, TUBE_MODES))
        thud = colour(rng.standard_normal(len(t)), hump(750 * pitch, 1.9, 14.6))
        thud *= amp(-60 * t / (0.069 * decay))
        add(out, start, amp(db) * (.4 * ring + .3 * thud))
    return out


def thumps():
    """Gusts, the fan's among them, hit the microphone as low pulses about a cycle long."""
    out, t = np.zeros(N), np.arange(6000) / SR
    for start, db, hz in THUMPS:
        envelope = 3 * hz * t * np.exp(1 - 3 * hz * t)
        add(out, start, amp(db) * envelope * np.cos(2 * np.pi * hz * t))
    return out


def boots():
    """Dry grass crackles in grains over a hiss, in bursts under each step; soles scuff dully."""
    grain_sizes = amp(4.3 * np.minimum(rng.exponential(1, N), 5))
    grains = grain_sizes * (rng.random(N) < 2500 / SR) * rng.standard_normal(N)
    grit = unit_rms(grains) + .8 * rng.standard_normal(N)
    grass = colour(rng.standard_normal(N), GRASS_SPECTRUM) * amp(1.6 * wander(N, size=400))
    scuff = colour(rng.standard_normal(N), SCUFF_SPECTRUM) * amp(0.8 * wander(N, size=400))
    out = np.zeros(N)
    for spell in RUSTLE_SPELLS:
        times, grass_db, scuff_db = np.transpose(spell)
        out += grass * amp(np.interp(T, times, grass_db, -200, -200))
        out += scuff * amp(np.interp(T, times, scuff_db, -200, -200))
    for start, length, db, hz in CRUNCHES:
        crunch = colour(grit[round(start * SR):][:round(length * SR)], hump(hz, 1.58, 10.8))
        add(out, start, amp(db) * crunch * signal.windows.tukey(len(crunch), .7))
    return out


def birds():
    """Thin whistles, most of them upswept, each with a fuzzy echo from the trees."""
    out, t = np.zeros(N), np.arange(9000) / SR
    for start, length, first_hz, last_hz, db in CHIRPS:
        progress = np.arange(0, length, 1 / SR) / length
        hz = last_hz + (first_hz - last_hz) * np.exp(-7 * progress)
        add(out, start, tone(hz, db, 2.5) * np.sin(np.pi * progress ** .6))
    echo = rng.standard_normal(len(t)) * amp(-60 * t / 0.2)
    return out + amp(6) * signal.oaconvolve(out, echo / np.linalg.norm(echo))[:N]


def wash_and_rumble():
    """A faint wash across the field; a rumble from the far engine, then from wind on the microphone."""
    wash = amp(FIELD_DB + .8 * wander(N, size=3000)) * colour(rng.standard_normal(N), FIELD_SPECTRUM)
    level = amp(np.interp(T, *np.transpose(LOW_RUMBLE)))
    for middle, length, db in PUFFS:
        level += amp(db) * span(T, middle - length / 2, middle + length / 2, length / 3)
    rumble = colour(rng.standard_normal(N), RUMBLE_SPECTRUM) * level * amp(2.2 * wander(N, size=900))
    return wash + rumble


def far_engine():
    """A distant engine drones, then drops in pitch and fades as it moves off."""
    away = np.clip((T - LEAVES_S) / (GONE_S - LEAVES_S), 0, 1)
    hz = ENGINE_HZ - ENGINE_FALL_HZ * away
    drone = tone(hz, ENGINE_DB, 0.73)
    overtones = tone(1.8 * hz, ENGINE_DB - 23, 2) + tone(2 * hz, ENGINE_DB - 12, 2)
    return np.sqrt(1 - away) * (drone + overtones)


def hums_and_squeals():
    """Faint hums and squeals of metal, each holding its pitch while its level wavers."""
    return sum(span(T, start, end, 0.05) * tone(np.full(N, hz), db, waver_db)
               for start, end, hz, db, waver_db in STEADY_TONES)


def amp(db):
    return 10 ** (np.asarray(db) / 20)


def unit_rms(x):
    return x / np.sqrt(np.mean(x ** 2) + 1e-20)


def db_at(spectrum, hz):
    """Interpolates a spectrum on a log-frequency axis."""
    points_hz, db = np.transpose(spectrum)
    return np.interp(np.log(hz + 1), np.log(points_hz + 1), db)


def colour(x, spectrum):
    """Filters by a spectrum; rms 1."""
    gain = amp(db_at(spectrum, np.fft.rfftfreq(len(x), 1 / SR)))
    return unit_rms(irfft(rfft(x) * gain, len(x)))


def hump(hz, width, steepness):
    """Spectrum peaking at hz, `width` a factor to either side."""
    shoulder_db, skirt_db = -.6 * steepness, -3 * steepness
    return [(hz / width ** 2, skirt_db), (hz / width, shoulder_db), (hz, 0),
            (hz * width, shoulder_db), (hz * width ** 3.2, skirt_db)]


def wander(count, size):
    """Smooth random curve of rms 1 that changes over `size` samples."""
    return unit_rms(uniform_filter1d(uniform_filter1d(rng.standard_normal(count), size), size))


def tone(hz, db, waver_db):
    """A sine along a frequency curve, its rms level wavering around db."""
    level = amp(db + waver_db * wander(len(hz), size=500))
    return np.sqrt(2) * level * np.sin(2 * np.pi * (np.cumsum(hz) / SR + rng.random()))


def span(t, first, last, fade):
    """Rises to 1 after `first`, falls to 0 at `last`."""
    return np.clip(np.minimum(t - first, last - t) / fade, 0, 1)


def add(mix, start, sound):
    part = mix[round(start * SR):][:len(sound)]
    part += sound[:len(part)]


def scene():
    """The field and both grinder runs at one microphone, the same in both channels."""
    mix = clicks() + tube_knocks() + thumps() + boots()
    mix += birds() + wash_and_rumble() + far_engine() + hums_and_squeals()
    add(mix, BLIP_ON_S, grinder(BLIP_ROAR, BLIP_ON_S, BLIP_OFF_S, FARTHER_DB))
    add(mix, CUT_ON_S, grinder(CUT_ROAR, CUT_ON_S, np.inf, CLOSE_DB))
    return np.array([mix, mix])


def record(dry):
    """Soft overload and bass roll-off; the highest treble falls away sharply above 15.8 kHz."""
    soft = 1.05 * np.tanh(dry / 1.05)
    low_cut = signal.sosfilt(signal.butter(4, 45, "high", fs=SR, output="sos"), soft)
    to_edge, to_top = (signal.firwin(1023, hz, window=("kaiser", 11), fs=SR)
                       for hz in (EDGE_HZ, TOP_HZ - 200))
    treble_cut = to_edge + amp(-41.5) * (to_top - to_edge)
    return signal.oaconvolve(low_cut, treble_cut[None], "same")


dry = scene()
out = record(dry)
log_audio(out)
```